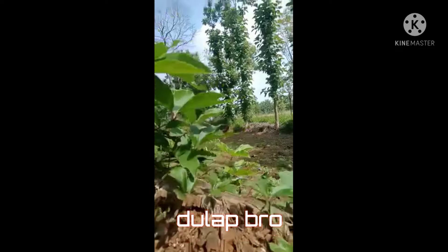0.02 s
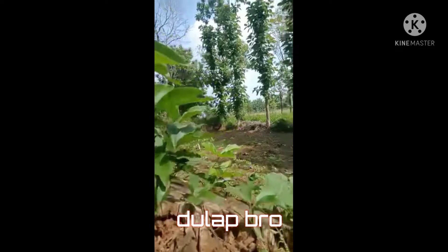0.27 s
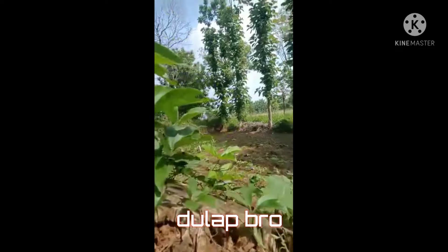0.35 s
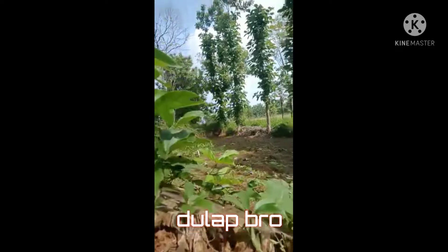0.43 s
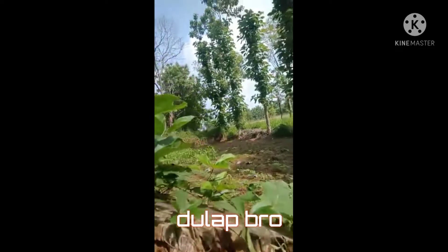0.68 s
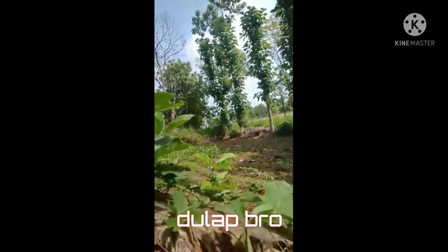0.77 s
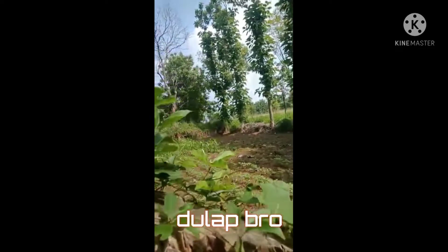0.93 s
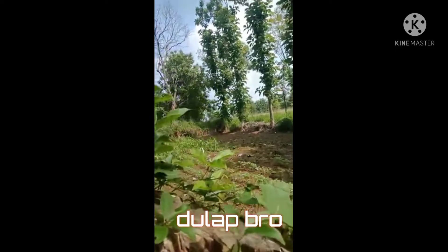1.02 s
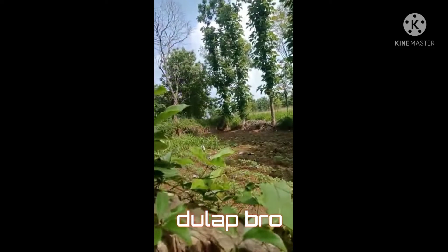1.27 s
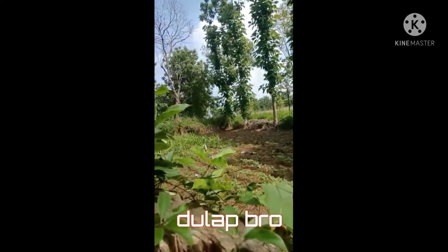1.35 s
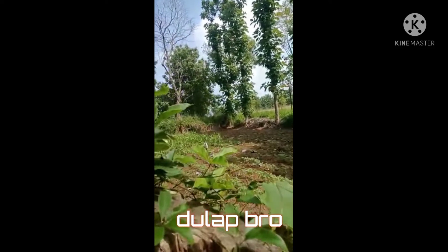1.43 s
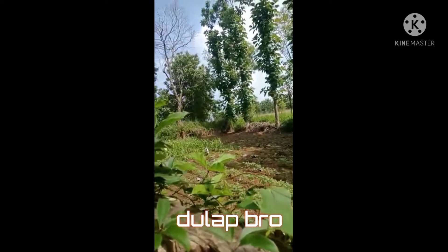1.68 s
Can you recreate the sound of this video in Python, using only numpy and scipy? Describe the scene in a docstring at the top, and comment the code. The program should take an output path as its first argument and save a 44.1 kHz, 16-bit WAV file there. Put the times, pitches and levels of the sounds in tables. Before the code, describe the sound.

After one sharp handling knock close to the microphone, a peacock gives a short hoot and a rising, falling wail in a rural field. Soft bumps continue as the echoes fade, over faint insects and thin bird whistles.

```python
"""Insects hum over open air and a low rumble throughout; small birds whistle thinly from the start.
At 0.24 s the hand-held camera takes one sharp knock, amid ticks and a light rustle.
A peacock calls twice across the field: a falling hoot at 0.32 s, a leaping wail at 0.55 s.
The trees throw both calls back; soft bumps and sways of the camera go on as the echoes fade."""
import sys
import numpy as np
from scipy import signal
from scipy.fft import rfft, irfft
from scipy.io import wavfile
from scipy.ndimage import uniform_filter1d

SR = 44100
rng = np.random.default_rng(int(sys.argv[2]) if len(sys.argv) > 2 else 0)


def dump(signal):
    """Clip the signal to [-1, 1] and save it as 16-bit WAV at the path in sys.argv[1]."""
    limited = np.clip(np.atleast_2d(signal).T, -1, 1)
    pcm = np.round(limited * 32767).astype(np.int16)
    wavfile.write(sys.argv[1], SR, pcm)


N = 74970
T = np.arange(N) / SR
HZ = np.fft.rfftfreq(N, 1 / SR)
PULSE_HZ = abs(np.fft.fftfreq(2 ** 12, 1 / SR))


def peacock(field_db=-7):
    """Two calls, their tree echoes and a diffuse tail."""
    # Falling hoot. Each row: time in seconds, pitch in Hz, level in dB.
    hoot = [(.315, 1785, -75), (.345, 1730, -61), (.365, 1674, -50), (.41, 1643, -48.5), (.45, 1582, -43),
            (.462, 1516, -61.5), (.475, 1503, -50)]
    # Wail: starts low, leaps, holds, falls. Each row: time in seconds, pitch in Hz, level in dB.
    wail = [(.55, 1020, -73), (.58, 828.8, -59), (.603, 831, -61.5), (.615, 1110, -61), (.624, 1300, -48),
            (.633, 1688, -44.5), (.66, 1604, -46.5), (.68, 1583, -52), (.695, 1436, -46.5),
            (.71, 1240, -49), (.722, 1166, -64)]
    voice = call(hoot) + call(wail)
    return voice + tree_echoes(voice) + amp(field_db) * field(voice)


def call(points, jitter=0.0065, shimmer_db=1):
    """A pure tone, trembling slightly in pitch and level."""
    s, pitch_hz, db = np.transpose(points)
    glide_hz = uniform_filter1d(np.interp(T, s, pitch_hz), size=250)
    hz = glide_hz * (1 + jitter * drift(72))
    envelope_db = np.interp(T, s, db, left=-140, right=-140)
    return amp(envelope_db + shimmer_db * drift(60)) * tone(hz)


def tree_echoes(x, spread_s=0.014):
    """Stands of trees reflect the sound; foliage smears each echo."""
    # Each row: delay in seconds, level in dB.
    echoes = [(0.063, -6.5), (.1, -9.5), (0.148, -14.5), (.29, -23)]
    taps = np.zeros(N)
    for delay_s, db in echoes:
        burst = rng.standard_normal(N) * gaussian(T - delay_s, spread_s)
        taps += amp(db) * burst / np.linalg.norm(burst)
    return signal.fftconvolve(x, taps)[:N]


def field(x, t60_s=1.04, build_s=0.0094):
    """Diffuse scatter from trees and ground."""
    taps = rng.standard_normal(N) * (1 - np.exp(-T / build_s)) * amp(-60 * T / t60_s)
    return signal.fftconvolve(x, taps / np.linalg.norm(taps))[:N]


def knocks(hollow_db=5.5, hollow_octaves=0.31, bass_hz=388):
    """Fingers bump the camera body, which rings briefly hollow."""
    # Each row: start in seconds, level in dB, low-pass corner and ring centre in Hz, bass shelf in dB.
    bumps = [(.2423, -1.5, 12000, -0.5), (0.2512, -28.5, 9000, -4), (0.3456, -17.5, 236, 2),
             (0.4971, -27, 380, 10), (0.5447, -18.5, 713, -3.5), (.6125, -26.5, 450, 8),
             (.647, -28, 306, 3.5), (0.791, -26, 1130, 0), (.819, -26.5, 987, -1), (1.218, -38.5, 710, -4),
             (1.481, -33, 231, 5.5)]
    # Camera body response. Each row: frequency in Hz, gain in dB.
    body = [(30, -64), (70, -13.5), (150, 1), (300, -1.5), (620, -2), (830, -9), (2000, -12.5), (3200, -19),
            (4000, -28), (5200, -54), (7000, -29.5), (9000, -58), (16000, -51)]
    out = np.zeros(N)
    for s, db, corner_hz, bass_db in bumps:
        ring_db = hollow_db * gaussian(np.log2((PULSE_HZ + 1) / corner_hz), hollow_octaves)
        shelf_db = bass_db / (1 + (PULSE_HZ / bass_hz) ** 4)
        gain = colour(body, PULSE_HZ) * amp(ring_db + shelf_db)
        add(out, s, amp(db) * impact(gain, corner_hz))
    return out


def ticks():
    """Dry, bright ticks on the camera."""
    # Each row: start in seconds, level in dB, low-pass corner in Hz.
    contacts = [(0.176, -41, 9000), (.345, -41, 10000), (.352, -37.5, 12000), (.4783, -23.5, 3480),
                (0.493, -32, 5000), (0.5207, -30, 15000)]
    # Tick spectrum. Each row: frequency in Hz, gain in dB.
    spectrum = [(200, -26), (1500, -15), (3300, -31), (5200, -22), (6400, -9.5), (7400, 6), (8500, -11),
                (12000, -17), (16000, -15)]
    out = np.zeros(N)
    for s, db, corner_hz in contacts:
        add(out, s, amp(db) * impact(colour(spectrum, PULSE_HZ), corner_hz))
    return out


def impact(gain, corner_hz):
    """One causal pulse, energy 1; a softer contact has a lower corner and is duller."""
    dulled = gain / np.sqrt(1 + (PULSE_HZ / corner_hz) ** 2)
    minimum_phase = np.exp(np.conj(signal.hilbert(np.log(dulled + 1e-5))))
    pulse = np.fft.ifft(minimum_phase).real[:len(gain) // 2]
    return -pulse / np.linalg.norm(pulse)


def sways(sigma_s=0.013):
    """The camera sways in short, low throbs."""
    # Each row: centre in seconds, peak level in dB, pitch in Hz.
    throbs = [(0.316, -49, 102.5), (0.359, -48, 85), (0.469, -43.5, 92), (0.518, -48.5, 80),
              (0.659, -52.5, 75.6), (0.756, -50.5, 80), (.9, -50, 73.9), (1.181, -53, 80),
              (1.271, -56, 80.4), (1.654, -47, 103)]
    return sum(amp(db) * gaussian(T - s, sigma_s) * np.cos(2 * np.pi * hz * (T - s))
               for s, db, hz in throbs)


def hand_rustle(grains_per_s=12000, spread_db=2.2):
    """Hand friction: dense, fine grains of uneven strength."""
    # Each row: time in seconds, level in dB.
    envelope = [(0, -72.5), (.14, -67), (.2, -58.5), (.3, -61), (.35, -60.5), (.4, -65.5), (.49, -54.5),
                (.54, -61.5), (.62, -59), (.7, -65.5), (.8, -61), (1.05, -71.5), (1.22, -91), (1.3, -64),
                (1.37, -83), (1.42, -99), (1.7, -105)]
    # Each row: frequency in Hz, gain in dB.
    spectrum = [(100, -6), (250, 7.5), (600, 4), (1500, 0), (3300, 4), (5200, -14), (7200, 5.5),
                (8500, -10), (12000, -17.5), (16000, -11.5)]
    strengths = rng.standard_normal(N) * amp(spread_db * np.minimum(rng.exponential(1, N), 4))
    grains = strengths * (rng.random(N) < grains_per_s / SR)
    return level(envelope) * unit(irfft(rfft(grains) * colour(spectrum, HZ), N))


def leaf_brushes():
    """Soft brushes against leaves: brief swells of hiss."""
    # Each row: centre in seconds, sigma in seconds, peak level in dB.
    touches = [(.112, 0.0013, -59), (.19, 0.013, -60), (1.363, 0.0059, -64.5)]
    # Each row: frequency in Hz, gain in dB.
    spectrum = [(500, -24), (2000, -8), (3400, 8), (5200, -15), (7200, 1), (9000, -10), (16000, -26)]
    envelope = sum(amp(db) * gaussian(T - s, sigma_s) for s, sigma_s, db in touches)
    return envelope * noise(colour(spectrum, HZ))


def small_birds(waver=0.00785, field_db=-3.5):
    """Thin, distant glides that swell and fade, scattered by the field."""
    # Each row: start in seconds, length in seconds, first pitch in Hz, last pitch in Hz, level in dB.
    whistles = [(-.01, 0.056, 4200, 3210, -65), (0.044, 0.085, 4000, 3684, -73),
                (.16, .03, 7400, 6980, -63.5), (.17, 0.049, 3880, 3440, -66.5),
                (.195, .04, 2250, 2107, -63), (.24, .1, 3214, 3160, -69), (.415, .05, 7500, 7460, -62.5),
                (.49, .075, 7000, 6350, -63.5), (.55, .06, 6400, 5860, -75),
                (0.455, 0.137, 4680, 4660, -77.5), (.745, .035, 7400, 7600, -65.5),
                (.78, .07, 7080, 6950, -58.5), (.85, .105, 6950, 5860, -71),
                (0.775, 0.091, 4656, 4730, -79), (0.965, .05, 3046, 2953, -70.5),
                (1.033, 0.116, 3010, 2830, -81), (1.23, .1, 2800, 3036, -74)]
    out = np.zeros(N)
    for start_s, length_s, first_hz, last_hz, db in whistles:
        progress = np.clip((T - start_s) / length_s, 0, 1)
        hz = (first_hz + (last_hz - first_hz) * progress) * (1 + waver * drift(108))
        out += amp(db) * np.sqrt(abs(np.sin(np.pi * progress))) * tone(hz)
    return out + amp(field_db) * field(out)


def insects(flutter_db=1.0):
    """Many distant insects merge into narrow, fluttering bands."""
    # Each row: centre in Hz, sigma in Hz, level in dB.
    bands = [(6860, 175, -73.5), (7540, 470, -75.5), (2880, 260, -78), (9700, 460, -87.5)]
    return sum(amp(db + flutter_db * drift(37)) * noise(gaussian(HZ - hz, sigma_hz))
               for hz, sigma_hz, db in bands)


def low_hum(pitch_hz=110.5, waver=0.044):
    """A wavering low tone that swells and recedes."""
    # Each row: time in seconds, level in dB.
    envelope = [(0, -70.5), (.12, -59), (.23, -51.5), (.29, -60), (.34, -52.5), (.45, -67), (1.2, -72.5),
                (1.37, -59.5), (1.6, -58.5), (1.7, -58.5)]
    return level(envelope) * tone(pitch_hz * (1 + waver * drift(22)))


def rumble(centre_hz=80.6, half_width_hz=4.7, db=-64.5):
    """A narrow band of low noise."""
    return amp(db) * noise(1 / (1 + ((HZ - centre_hz) / half_width_hz) ** 4))


def open_air(db=-64.5, swell_db=1.45):
    """Broad, bass-heavy noise of slightly unsteady level."""
    # Each row: frequency in Hz, gain in dB.
    spectrum = [(20, -17), (45, 0), (130, 11.5), (220, 1), (600, -0.5), (1000, -3), (2000, -6.5),
                (3000, -9.5), (4000, -11.5), (5200, -27.5), (7000, -14), (9800, -26), (12500, -32),
                (16000, -23)]
    return amp(db + swell_db * drift(12.4)) * noise(colour(spectrum, HZ))


def amp(db):
    """Decibels to gain."""
    return 10 ** (np.asarray(db) / 20)


def unit(x):
    """Scales to rms 1."""
    return x / np.sqrt(np.mean(x ** 2) + 1e-20)


def gaussian(offset, sigma):
    """Bell curve, peak 1."""
    return np.exp(-.5 * (offset / sigma) ** 2)


def colour(points, hz):
    """Gain of a spectrum table on a log-frequency axis."""
    points_hz, db = np.transpose(points)
    return amp(np.interp(np.log(hz + 1), np.log(points_hz), db))


def level(points):
    """Gain over time from a level curve."""
    return amp(np.interp(T, *np.transpose(points)))


def noise(gain):
    """Noise with the given spectrum, rms 1."""
    return unit(irfft(rfft(rng.standard_normal(N)) * gain, N))


def drift(rate_hz):
    """Random wander below rate_hz, rms 1."""
    return noise(1 / (1 + (HZ / rate_hz) ** 4))


def tone(hz):
    """Sine along a pitch curve, rms 1."""
    return np.sqrt(2) * np.sin(2 * np.pi * np.cumsum(hz) / SR)


def add(mix, start_s, sound):
    """Mixes a sound in at start_s."""
    part = mix[max(round(start_s * SR), 0):][:len(sound)]
    part += sound[:len(part)]


def scene():
    """Wildlife, camera handling and background, in mono."""
    wildlife = peacock() + small_birds() + insects()
    handling = hand_rustle() + leaf_brushes() + knocks() + ticks() + sways()
    background = open_air() + rumble() + low_hum()
    return (wildlife + handling + background)[None]


def record(dry, cutoff_hz=15750):
    """Steep low-pass band limit."""
    lowpass = signal.firwin(511, cutoff_hz, window=("kaiser", 9), fs=SR)
    return signal.oaconvolve(dry, lowpass[None], "same")


dry = scene()
out = record(dry)
dump(out)
```